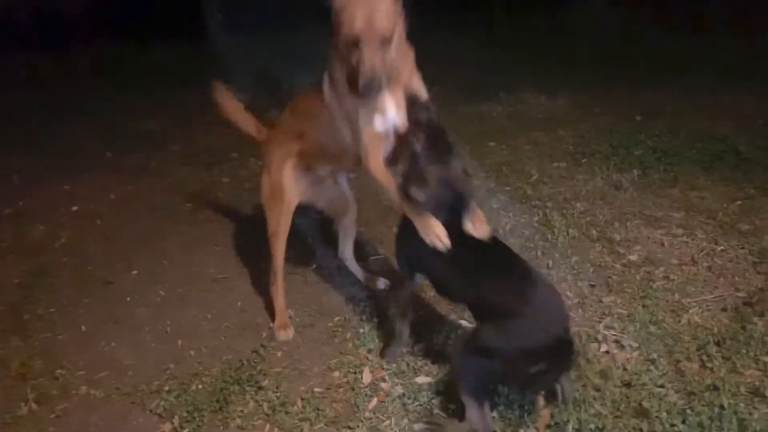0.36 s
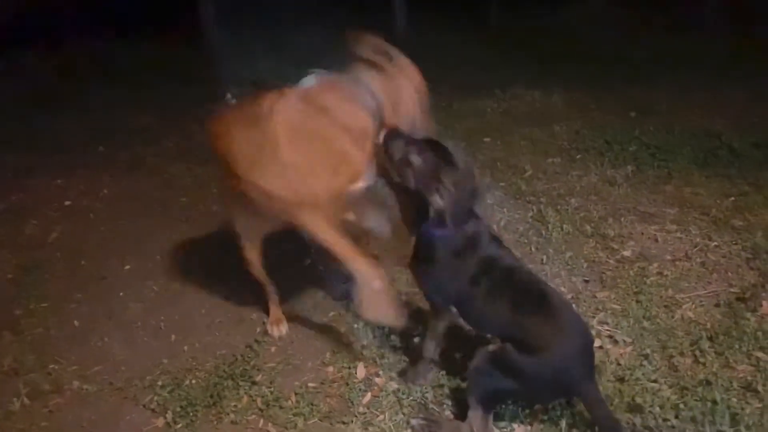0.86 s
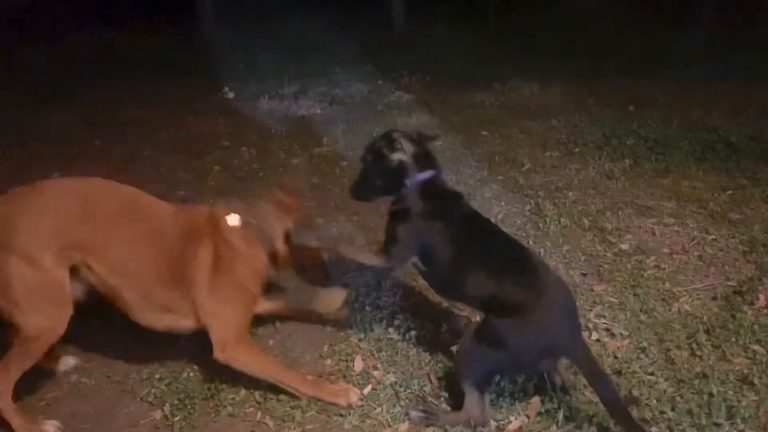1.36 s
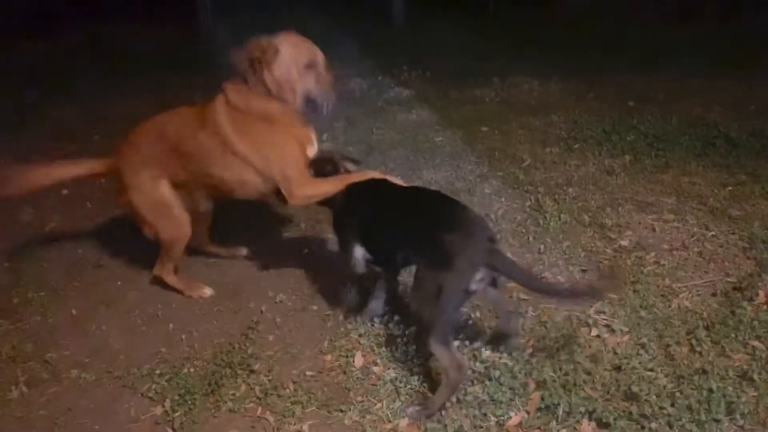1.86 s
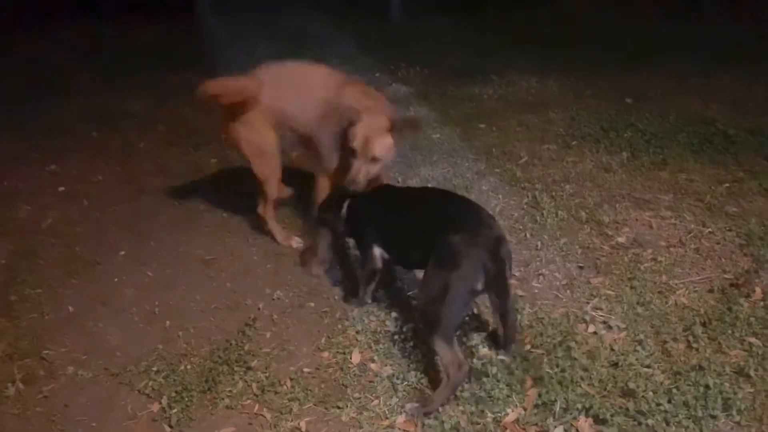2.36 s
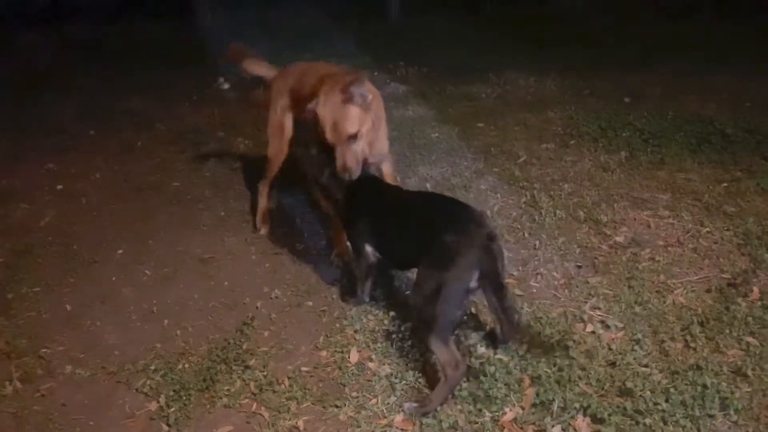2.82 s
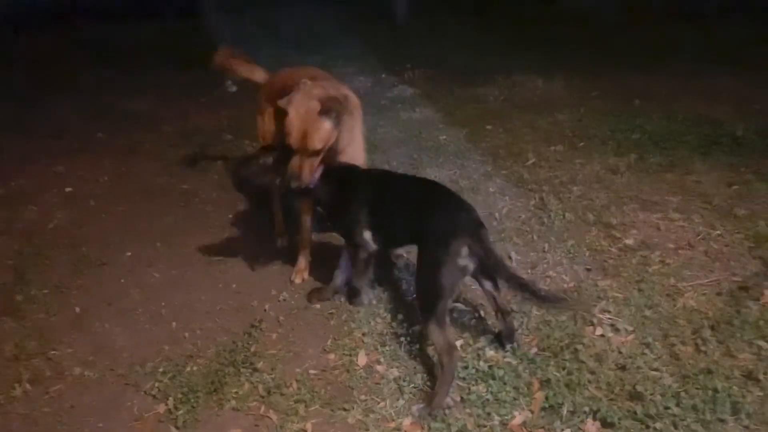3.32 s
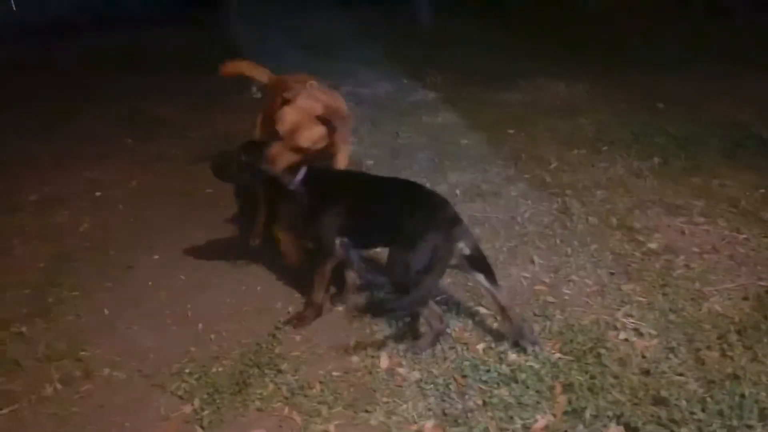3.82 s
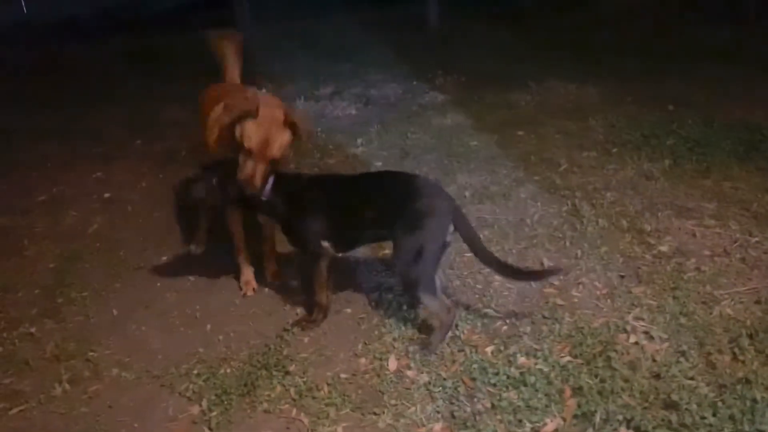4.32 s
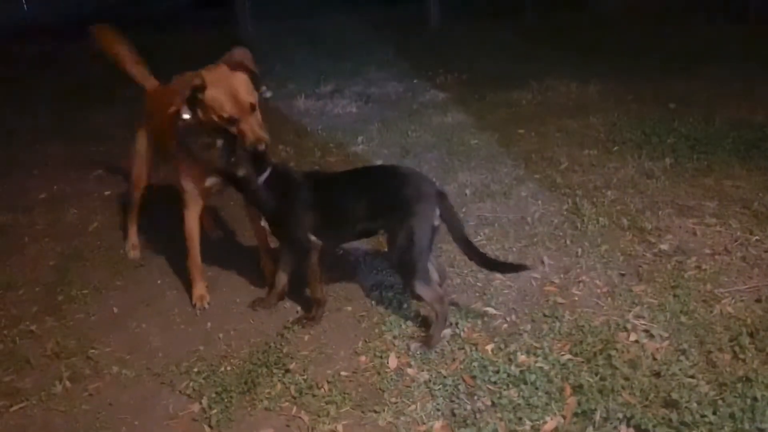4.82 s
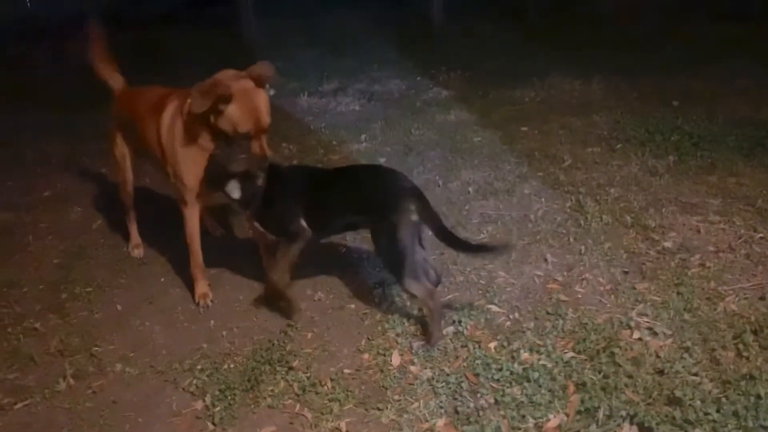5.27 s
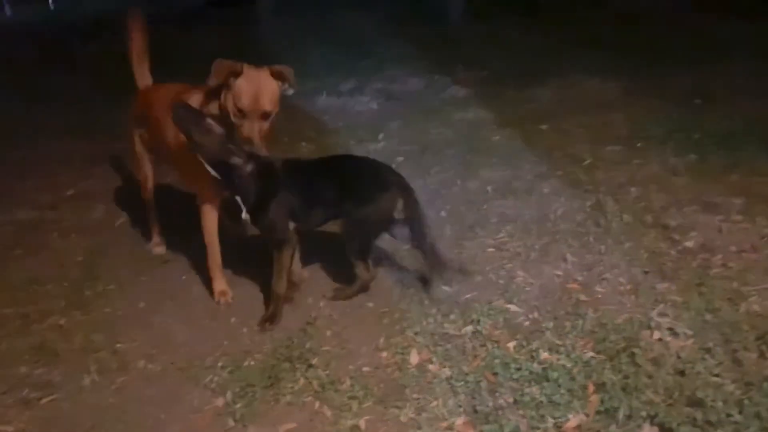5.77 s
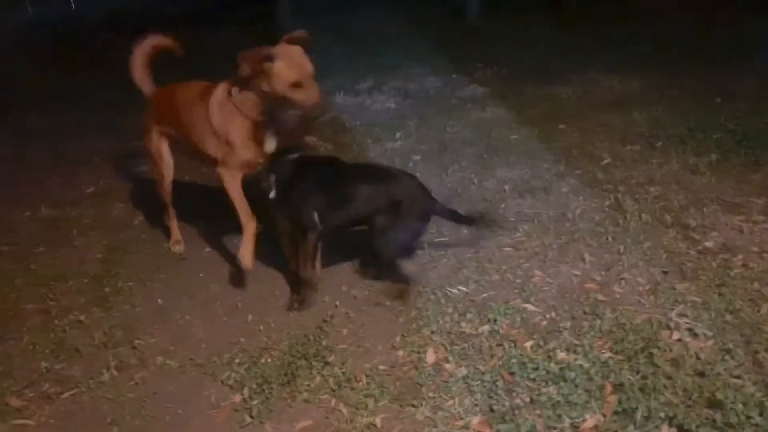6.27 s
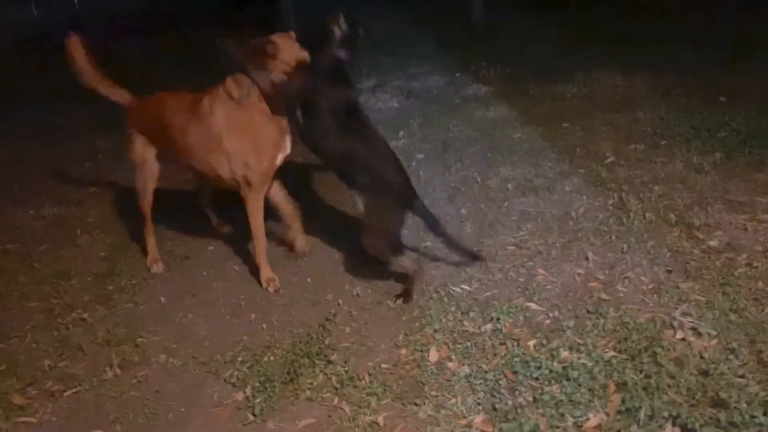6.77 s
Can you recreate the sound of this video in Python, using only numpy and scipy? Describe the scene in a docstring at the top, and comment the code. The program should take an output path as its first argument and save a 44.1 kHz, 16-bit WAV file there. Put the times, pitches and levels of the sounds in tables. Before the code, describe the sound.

Two dogs scuffle on grass at night, collar tags jingling brightly, with a thin whine and wet snort, over crickets and low traffic rumble.

```python
"""Two dogs wrestle on a lawn at night: struck modes ring as collar tags clink, noise puffs in body
resonances thump, dense grains scuff the grass and snap; one dog snorts (flapped air in nose
resonances) and whines (an arched sine). Behind: noise and a wavering drone for traffic, pulsed tones
and noise for crickets and a katydid. Two microphone ports a few centimetres apart hear it."""
import sys
import numpy as np
from scipy import signal
from scipy.fft import rfft, irfft
from scipy.io import wavfile

SR = 44100
rng = np.random.default_rng(int(sys.argv[2]) if len(sys.argv) > 2 else 0)


def store_wav(level_fs):
    """Save 16-bit WAV to argv[1]."""
    pcm = np.round(np.clip(np.atleast_2d(level_fs), -1, 1) * 32767)
    wavfile.write(sys.argv[1], SR, pcm.T.astype(np.int16))


def invert_db(x):
    """Field ratio 10**(x/20) for x, a level in decibels (scalar or array-like)."""
    u = np.asarray(x, float) / 20
    return 10 ** u


N = 303849
TIME = np.arange(N) / SR
HZ = np.maximum(np.arange(N // 2 + 1) * SR / N, 1)


def rms_one(x):
    """Scale to rms 1."""
    return x / np.sqrt(np.mean(x ** 2) + 1e-20)


def in_time(rows, silent_db=None):
    """Columns of a curve table at every sample."""
    s, *columns = np.transpose(rows)
    return [np.interp(TIME, s, c, silent_db, silent_db) for c in columns]


def over_hz(points):
    """A (Hz, value) table at every FFT bin, interpolated over log frequency."""
    hz, value = np.transpose(points)
    return np.interp(np.log(HZ), np.log(hz), value)


def coloured(x, spectrum_db):
    """Give a steady signal a spectrum."""
    return irfft(rfft(x) * invert_db(spectrum_db), N)


def drift(rate_hz):
    """Slow chance: low-passed noise of rms 1."""
    r = np.exp(-2 * np.pi * rate_hz / SR)
    noise = rng.standard_normal(N + SR)
    settled = signal.lfilter([1], [1, -2 * r, r * r], noise)[SR:]
    return rms_one(settled)


def ring(clicks, hz, t60_s):
    """Two-pole mode: a unit click starts a dying sine of height 1."""
    r, w = invert_db(-60 / (t60_s * SR)), 2 * np.pi * hz / SR
    return signal.lfilter([0, np.sin(w)], [1, -2 * r * np.cos(w), r * r], clicks + 1e-18)


def resonance(x, hz, width_hz):
    """Two-pole band-pass with gain near 1 on top."""
    r = np.exp(-np.pi * width_hz / SR)
    top = np.array([1, 0, -1]) * (1 - r * r) / 2
    return signal.lfilter(top, [1, -2 * r * np.cos(2 * np.pi * hz / SR), r * r], x)


def band(x, low_hz, high_hz):
    """Steep band-pass."""
    return signal.sosfilt(signal.butter(3, [low_hz, high_hz], "band", fs=SR, output="sos"), x)


def clicks_at(times_s, sizes):
    """Single samples of given sizes at given moments."""
    out = np.zeros(N)
    np.add.at(out, np.round(np.asarray(times_s) * SR).astype(int), sizes)
    return out


def dying(clicks, t60_s):
    """Envelope that jumps at each click and dies away."""
    return signal.lfilter([1], [1, -invert_db(-60 / (t60_s * SR))], clicks + 1e-18)


def bumps(rows):
    """Bell-shaped swells at given moments."""
    return sum(invert_db(level_db) * np.exp(-((TIME - s) / half_s) ** 2) for s, level_db, half_s in rows)


def grains(per_s, spread_db, spectrum):
    """Dense uneven cracks, two patches that share their clumps; each rms 1."""
    sizes = invert_db(spread_db * np.minimum(rng.exponential(1, (2, N)), 5)) * rng.choice([-1, 1], (2, N))
    chance = per_s * invert_db(3.0 * drift(25)) / SR
    cracks = sizes * (rng.random((2, N)) < chance)
    return np.array([rms_one(coloured(c, over_hz(spectrum))) for c in cracks])


def wide(mid, side):
    """Left and right from sum and difference."""
    return np.array([mid + side, mid - side])


# Tags striking each other. Each row: start in seconds, blow strength in relative dB,
# then ring of the five mode families from low to high in relative dB.
CLINKS = [(0.366, -43, -68, -69, -39.5, -68, -68), (0.4687, -21, -52, -66, -42.5, -56, -39),
          (0.526, -37, -59, -68, -43, -61, -59), (0.6394, -38, -51, -59, -68, -64, -51),
          (0.9915, 0, -19, -53, -26, -12, -21), (0.9964, -7, -26.5, -23, -35, -34, -38),
          (1.0223, -24, -36, -32.5, -37, -39, -33), (1.1955, -29, -57, -63, -40.5, -39, -44),
          (1.222, -23, -41, -53, -24.5, -34, -38), (1.2427, -19, -42.5, -48, -28.5, -31, -31),
          (1.2831, -13, -43, -59, -19, -34, -24), (1.308, -16.5, -42, -37.5, -36, -34.5, -31),
          (1.3435, -36, -61, -55, -41.5, -54, -36), (1.4508, -16, -35, -47, -48.5, -33, -42),
          (1.606, -44, -63, -70, -47, -41, -60), (1.6665, -40, -63, -70, -40.5, -39, -56),
          (1.708, -46, -63, -70, -43, -60, -46), (1.7254, -34, -62, -70, -38.5, -51, -47),
          (1.7667, -27, -53.5, -63, -40.5, -43, -36), (1.8379, -24, -58, -54, -34, -57, -54),
          (1.923, -19, -48.5, -64, -55.5, -33, -48), (1.966, -36, -57, -39, -38, -35, -41),
          (1.9714, -20, -34.5, -34.5, -39, -30.5, -37), (2.0128, -21.5, -28.5, -57, -37, -24.5, -40),
          (2.3186, -23.5, -52, -67, -44, -42, -40), (2.346, -19.5, -46, -55, -38.5, -41, -35),
          (3.6272, -39, -68, -74, -56, -46, -64), (6.6843, -25.5, -33.5, -56, -46, -75, -62),
          (6.8183, -55, -67, -65, -54, -69, -70), (6.8621, -30, -49, -65, -41, -38, -50)]
# Modes of the tags, one list per family. Each row: frequency in Hz, level in relative dB, t60 in s.
TAG_MODES = [
    [(4813, -2, .12), (4930, -3, .1), (4670, -13, .06), (11780, -9, .07), (1850, -14, .1)],
    [(6568, 1, .16), (6604, -5, .12), (7650, -8, .1), (11110, 2, .1)],
    [(8057, 0, .17), (8160, -2, .11), (8350, -11, .07), (9110, -16, .08)],
    [(13616, 0, .11), (13500, -5, .05), (15600, -11, .07), (14050, -4, .08)],
    [(14385, 0, .13), (14220, -5, .06)],
]
# Light tag touches against the rustle. One value per family, in relative dB.
JOSTLE_DB = [-15, -34.5, -22.5, -22, -22]


def tags():
    """Each clink is quick touches that strike all modes, and a crack; chatter and swing waver the ring."""
    soft_db, harden_db = -34, 15
    crack_db, ring_db = -15.5, -5
    rows = np.array(CLINKS)
    start_s, blow_db = rows[:, 0], rows[:, 1]
    chance_db = rng.normal(0, 1.6, (len(rows), 24))
    touches = (rng.random(N) < 2500 / SR) * rng.standard_normal(N)
    chatter = (rng.random(N) < 300 / SR) * rng.standard_normal(N)
    jostle = invert_db(in_time(SCUFF, silent_db=-120)[0])  # light touches whenever the dogs move
    # strong blows ring at once, weak ones build up
    hard = clicks_at(start_s, np.clip((blow_db - soft_db) / harden_db, .45, 1.7))
    out, k = np.zeros(N), 0
    for family, modes in enumerate(TAG_MODES):
        swing = invert_db(2.6 * drift(45))
        for hz, level_db, t60_s in modes:
            mode_db = rows[:, 2 + family] + ring_db + level_db + chance_db[:, k]
            blows = clicks_at(start_s, invert_db(mode_db))
            strike = np.minimum(hard, .85) * blows + 0.25 * dying(blows, .012) * touches
            light = invert_db(level_db + JOSTLE_DB[family]) * jostle
            after = (.22 * dying(blows, .1) + light) * chatter
            out += swing * ring(1.48 * strike + after, hz, t60_s)
            # part of the blow is damped at once, while the tags still touch
            out += 0.54 * ring(hard ** 2 * blows, hz, 0.025)
            k += 1
    blows = clicks_at(start_s, invert_db(blow_db + crack_db))
    tail = invert_db(-7.5) * dying(blows, 0.22) * invert_db(2.5 * drift(90))
    crack = (dying(blows, 0.0025) + tail) * rng.standard_normal(N)
    return out + signal.sosfilt(signal.butter(2, 1600, "high", fs=SR, output="sos"), crack)


# Paws, bodies and jaws knocking, and one low push of air under the snort at 2.52 s.
# Each row: start in seconds, peak in dB before the port balance, resonance in Hz, t60 of the puff in s.
THUMPS = [(0.359, -43.5, 296, 0.03), (0.693, -36, 442, 0.12), (0.693, -30.5, 1760, 0.095),
          (0.71, -35.5, 2530, 0.16), (.683, -37, 1690, .02), (0.991, -24.5, 2393, 0.027),
          (.988, -40, 1010, 0.017), (1.047, -37.5, 457, 0.054), (1.081, -38, 445, 0.043),
          (1.186, -38.5, 253, 0.074), (1.235, -37, 1700, 0.1), (1.314, -37, 205, 0.031),
          (1.402, -40, 970, 0.14), (1.678, -40, 864, 0.046), (1.78, -38, 363, 0.17),
          (2.325, -31, 295, 0.075), (2.521, -38, 110, 0.077), (5.71, -43, 743, 0.26)]


def thumps():
    """A soft blow: a push and a dying puff of noise, in a broad resonance."""
    out, length = np.zeros(N), SR // 4
    for s, peak_db, hz, t60_s in THUMPS:
        sparse = rng.standard_normal(length) * 4.3 * (rng.random(length) < .2)
        puff = sparse * invert_db(-60 * TIME[:length] / t60_s)
        puff[0] += 8.0  # the push
        blow = resonance(resonance(puff, hz, 0.45 * hz), hz, 0.45 * hz)
        at = round(s * SR)
        out[at:at + length] += invert_db(peak_db) * blow / np.abs(blow).max()
    return out


# Vigour of the wrestling, as rustle of the grass. Each row: time in seconds, level in dB.
SCUFF = [(0.0, -63), (0.25, -63.5), (0.55, -48), (0.85, -57.5), (1.19, -51.5), (1.5, -57), (1.85, -49),
         (2.15, -63), (2.36, -67.5), (2.56, -49.5), (2.8, -64), (3.1, -88)]
# Single brushes through the grass, and short dry snaps and clicks.
# Each row: centre in seconds, rustle in dB, half length in s.
BRUSHES = [(.024, -53.5, 0.011), (0.207, -42, 0.0037), (1.077, -38, 0.0071), (1.179, -40, 0.00097),
           (1.403, -48, 0.0033), (2.212, -47, 0.0029), (0.246, -44.5, 0.025), (0.816, -46.5, 0.022),
           (2.408, -48, 0.037), (3.28, -61, 0.029), (3.556, -60, 0.075), (3.658, -61, 0.032),
           (4.08, -63.5, 0.033), (4.278, -60.5, 0.042), (4.6, -61, 0.02), (4.908, -66.5, 0.12),
           (5.349, -66, 0.12), (5.827, -59, 0.026), (6.198, -61.5, 0.045), (6.312, -54, .005),
           (6.555, -59, 0.0039), (1.918, -43, 0.0018), (6.328, -54.5, 0.079), (6.84, -57.5, 0.03)]
# Paws scraping bare soil. Each row: centre in seconds, level in dB, half length in s.
SCRAPES = [(5.45, -61.5, 0.076), (6.3, -63, 0.19)]
# Spectrum of the grass rustle, with its top cut off near 15.8 kHz.
# Each row: frequency in Hz, relative density in dB per Hz.
GRASS = [(1500, -18), (3000, 1), (5000, -4.5), (7000, -0.5), (11000, 1.5), (15400, -5), (15900, -32)]
# Spectrum of grating soil. Each row: frequency in Hz, relative density in dB per Hz.
GROUND = [(120, -17), (350, -7.5), (900, 6.5), (1700, 0.5), (2800, 0.5), (4000, -12)]


def scuff():
    """Grass rustles and snaps at the dogs and around them, soil grates under their paws."""
    drag_db = -1.5  # soil against the rustle
    wrestling, brush = invert_db(in_time(SCUFF, silent_db=-120)[0]), bumps(BRUSHES)
    near, spread = (wrestling + brush) * grains(10000, 2.1, GRASS)
    soil_level = invert_db(drag_db) * (wrestling + 0.55 * brush) + bumps(SCRAPES)
    drag = soil_level * grains(4000, 1.3, GROUND)
    side = invert_db(-6.0) * spread + invert_db(-3.0) * drag[1]
    return near, drag[0], wide(0 * spread, side)


# The snort. Each row: time in seconds, level in dB, mouth opening as a factor on the resonances,
# gain of the chest resonances under 600 Hz in dB.
SNORT = [(2.41, -62, 0.86, -12), (2.432, -39.5, 1.04, -5), (2.452, -42, 0.92, -2), (2.475, -34, 1.08, -4),
         (2.53, -33.5, 0.93, 3), (2.595, -38.5, 0.955, 1.5), (2.63, -47.5, .92, 1.5), (2.72, -53, 1.06, 6),
         (2.77, -54.5, 1.05, 0)]
# Nose and chest resonances. Each row: frequency in Hz at opening 1, width of one of two passes in Hz,
# level in relative dB.
NOSE = [(110, 91, 2), (334, 150, 0), (547, 66, 1), (830, 297, 3), (1890, 320, -5.5), (2700, 1300, -21.5)]


def snort():
    """Air flaps nose and lips in uneven bursts, 32.5 a second; resonances slide with the mouth."""
    level_db, opening, chest_db = in_time(SNORT)
    flap = np.cos(2 * np.pi * 32.5 * (TIME - 2.528)) + .7 * drift(90)
    pulses = np.diff(np.cumsum(185 * (1 + .12 * drift(40))) // SR, prepend=0)
    rasp = pulses * invert_db(4 * drift(150))  # uneven throat pulses
    air = (rng.standard_normal(N) + .8 * rms_one(rasp)) * invert_db(3.4 * flap)
    # playing the filtered air faster or slower slides all resonances
    clock = np.cumsum(opening) + 1
    steady = np.interp(np.arange(N), clock, air)
    nose = np.zeros(N)
    for k, (hz, width_hz, db) in enumerate(NOSE):
        filtered = resonance(resonance(steady, hz, width_hz), hz, width_hz)
        slid = np.interp(clock, np.arange(N), filtered)
        nose += invert_db(db + chest_db * (hz < 600)) * slid * (-1) ** k
    sounding = (TIME > SNORT[0][0]) & (TIME < SNORT[-1][0])
    return invert_db(level_db) * sounding * nose / nose[sounding].std()


def whine():
    """A thin short squeak: a sine of unsteady pitch and level; the pitch arches up and back."""
    centre_s, half_s, level_db = 1.738, .048, -50
    top_hz, arch_hz = 1690, 40
    place = np.clip((TIME - centre_s) / half_s, -4, 4)
    hz = (top_hz - arch_hz * (place - .5) ** 2) * (1 + .03 * drift(120))
    level = invert_db(level_db + 4.0 * drift(80)) * np.exp(-place ** 4)
    return level * np.sin(2 * np.pi * np.cumsum(hz) / SR)


# Phase between the ports; the right one is nearer the dogs.
# Each row: frequency in Hz, lead of the right port in radians at bearing 1.
PORT_PHASE = [(260, -.3), (860, .3), (1900, 1.9), (3400, 3.3), (4870, 5.4), (6570, 5.5), (8100, 7.0),
              (11200, 9.8), (13620, 12.5), (16500, 14.8)]


def ports(x, bearing):
    """One sound reaches the two ports with a phase difference set by where it comes from."""
    half = np.exp(.5j * bearing * over_hz(PORT_PHASE))
    return irfft(rfft(x) * np.array([1 / half, half]), N)


def yard(x):
    """Faint dull echoes from fence and wall, other ones on each side."""
    dull, out = signal.lfilter([.4], [1, -.6], x), np.zeros((2, N))
    for k, (s, db) in enumerate([(.021, -22), (.027, -22), (.048, -26), (.057, -27)]):
        lag = round(s * SR)
        out[k % 2, lag:] += invert_db(db) * dull[:-lag]
    return out


# Engine rumble. Each row: time in seconds, level in dB.
TRAFFIC = [(0, -54), (.2, -75), (3.4, -71), (3.6, -58), (4.1, -61), (4.5, -51), (4.8, -52), (6.89, -51)]
# Spectrum of the rumble. Each row: frequency in Hz, relative density in dB per Hz.
RUMBLE = [(30, -18), (45, -6.5), (62, 7), (90, -5), (130, -4), (200, -47.5)]
# Spectrum of the steady background wash, with gaps in the treble.
# Each row: frequency in Hz, relative density in dB per Hz.
WASH = [(12, -36), (20, -5.5), (86, 1), (323, -13.5), (670, -16.5), (1080, -14), (2120, -25.5), (3330, -39),
        (4410, -27.5), (5360, -49.5), (8650, -47.5), (10500, -74), (11800, -42.5), (13300, -36.5),
        (13900, -44), (14600, -70), (16500, -90)]
# Stereo width of rumble and wash. Each row: frequency in Hz, side minus mid in dB.
WASH_SIDE = [(60, -12.5), (130, -7), (290, -11.5), (640, -8), (1410, 1.5), (3100, -0.5), (6820, 0),
             (15000, 1.5)]
# One nearer engine. Each row: time in seconds, pitch in Hz, level in dB.
DRONE = [(0, 64.53, -50), (.2, 61.94, -71.5), (4.1, 60.13, -62.5), (4.45, 60.3, -42), (4.9, 56.1, -57.5),
         (5.6, 84, -63.5), (6.0, 83.86, -48), (6.4, 72, -49), (6.89, 74.1, -44.5)]


def traffic():
    """Low engine rumble, a wavering drone and a broad wash of noise; the lows reach the left port first."""
    wash_start_db, fade_db_per_s = -48, 0.33
    rumble_db, = in_time(TRAFFIC)
    wash_db = wash_start_db - fade_db_per_s * TIME
    side_db = over_hz(WASH_SIDE)
    out = 0
    for spectrum, level_db in ((RUMBLE, rumble_db), (WASH, wash_db)):
        white = rng.standard_normal((2, N))
        mid = coloured(white[0], over_hz(spectrum))
        side = coloured(white[1], over_hz(spectrum) + side_db)
        out = out + invert_db(level_db) * wide(mid, side) / mid.std()
    drone_hz, drone_db = in_time(DRONE)
    turn = 2 * np.pi * np.cumsum(drone_hz) / SR
    drone = (1.5 + drift(3.4)) * np.sin(turn) + drift(6.5) * np.cos(turn)
    out = out + invert_db(drone_db) * rms_one(drone)
    lead = np.exp(-.15j * np.clip(np.log(600 / HZ), 0, 1))
    return irfft(rfft(out) * np.array([1 / lead, lead]), N)


# A brief dip of the crickets: centre in seconds, half length in s, depth in dB.
CRICKET_LULL = (5.21, 0.088, 35)
# The katydid. Each row: time in seconds, level in dB.
KATYDID = [(0, -92), (2.9, -88), (3.3, -63.5), (3.5, -61), (3.7, -80.5), (4.3, -67.5), (4.55, -78),
           (4.7, -70.5), (5.4, -69), (5.7, -62.5), (5.9, -69), (6.2, -63.5), (6.4, -80), (6.6, -73.5),
           (6.75, -77.5), (6.89, -71)]


def insects():
    """Crickets stroke their wings about 51 times a second; a katydid gives two strokes a cycle, at 67 Hz."""
    cricket_db, grows_db_per_s = -74, 0.58
    stroke = 1 + .58 * np.cos(2 * np.pi * np.cumsum(51.4 * (1 + .012 * drift(1.5))) / SR)
    chorus = resonance(band(rng.standard_normal((2, N)) * stroke, 3950, 4800), 4350, 300)
    # one nearer cricket sings a clearer note
    note_hz = 4350 * (1 + .012 * drift(25))
    near = stroke ** 2 * np.sin(2 * np.pi * np.cumsum(note_hz) / SR)
    lull_s, half_s, depth_db = CRICKET_LULL
    lull_db = depth_db * np.exp(-((TIME - lull_s) / half_s) ** 2)
    level_db = cricket_db + grows_db_per_s * TIME - lull_db
    crickets = invert_db(level_db) * (wide(*rms_one(chorus)) + 0.95 * rms_one(near))
    cycle = np.cumsum(np.full(N, 67.25 / SR)) % 1
    pair = np.exp(-((cycle - .3) / 0.079) ** 2) + np.exp(-((cycle - .635) / 0.073) ** 2) + 0.24
    rasp = band(rng.standard_normal(N) * pair, 11200, 13750)
    buzz = resonance(rasp, 13300, 500) + .45 * resonance(rasp, 12500, 700)
    return crickets + invert_db(in_time(KATYDID)[0]) * rms_one(buzz)


def scene():
    """Dogs through the ports, the night all around."""
    rustle, drag, spread = scuff()
    high = tags() + rustle + whine()
    low = thumps() + drag + snort()
    balance = invert_db(np.array([[1.2], [-1.2]]))  # left, right
    dogs = ports(high, bearing=0.95) + ports(low, bearing=0.071) * balance
    return dogs + yard(high + low) + spread + traffic() + insects()


def low_pass(x):
    """Removes everything above the highest recorded frequency."""
    return signal.sosfilt(signal.butter(12, 16650, fs=SR, output="sos"), x)


def record(dry):
    """The microphone has a dip near 10.5 kHz and the top is cut."""
    notch = signal.butter(2, [9400, 11500], "bandstop", fs=SR, output="sos")
    heard = .02 * dry + .98 * signal.sosfilt(notch, dry)
    mix = signal.sosfilt(signal.cheby2(10, 40, 16600, fs=SR, output="sos"), heard)
    return low_pass(mix)


dry = scene()
out = record(dry)
store_wav(out)
```